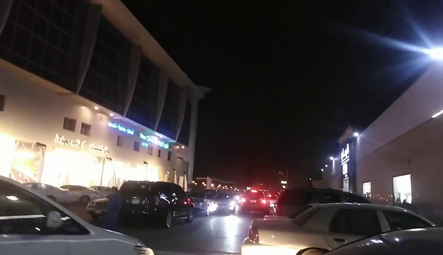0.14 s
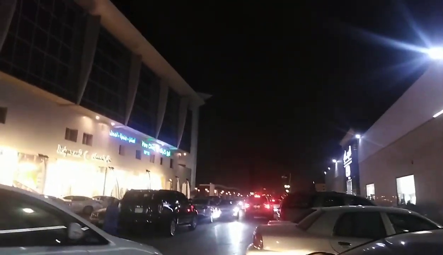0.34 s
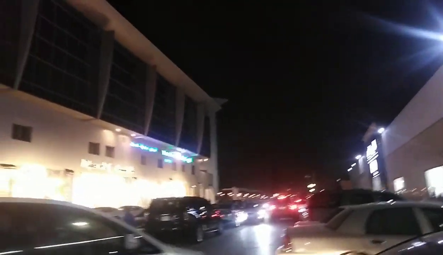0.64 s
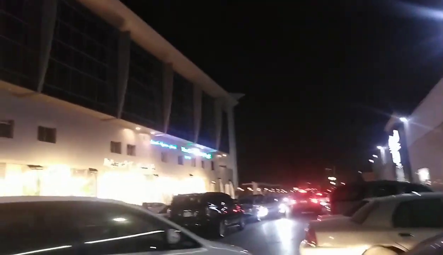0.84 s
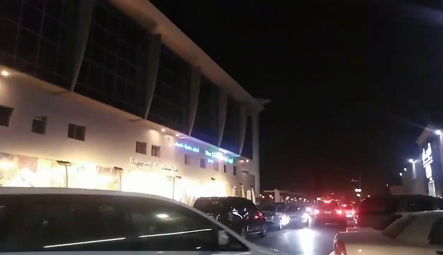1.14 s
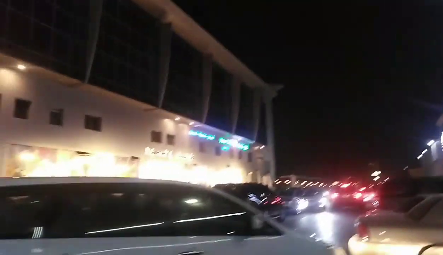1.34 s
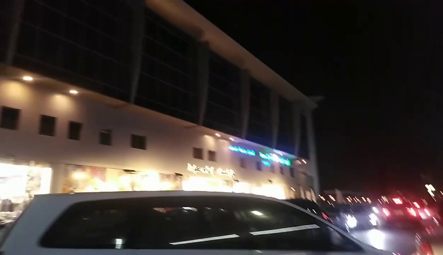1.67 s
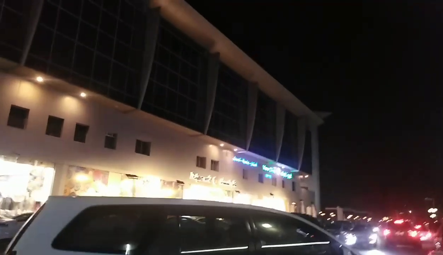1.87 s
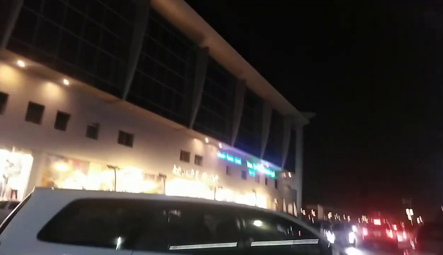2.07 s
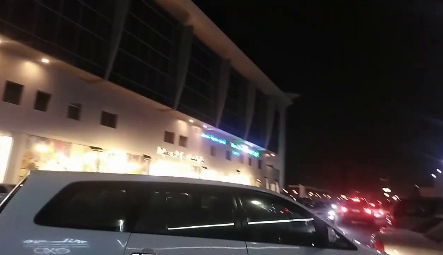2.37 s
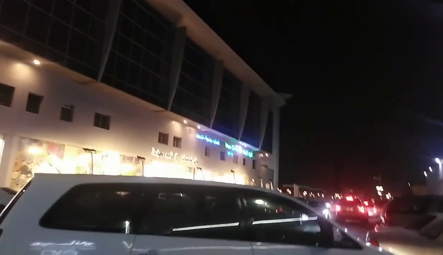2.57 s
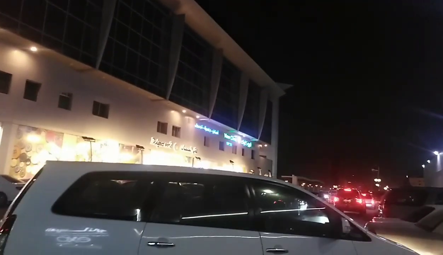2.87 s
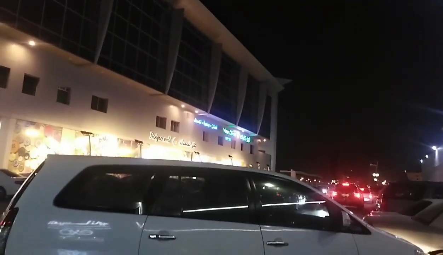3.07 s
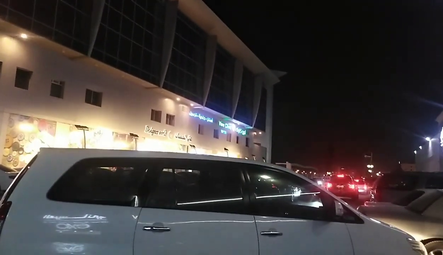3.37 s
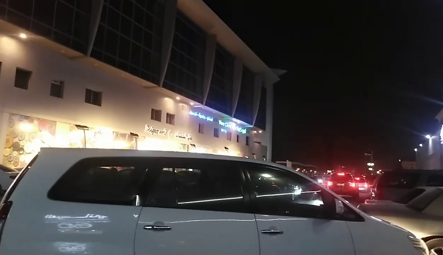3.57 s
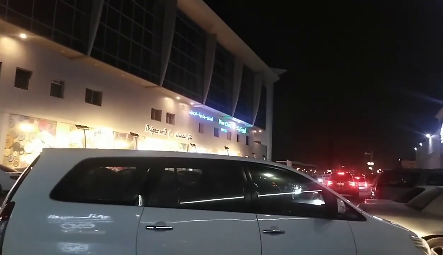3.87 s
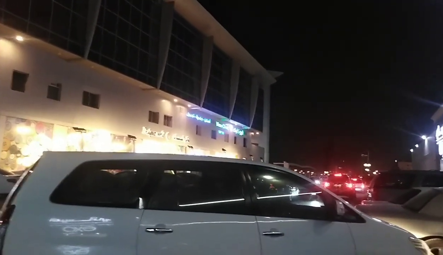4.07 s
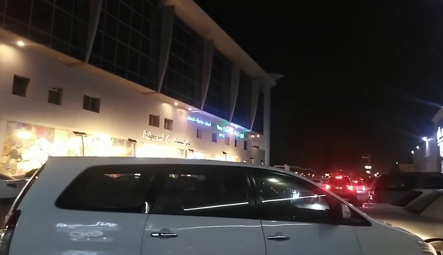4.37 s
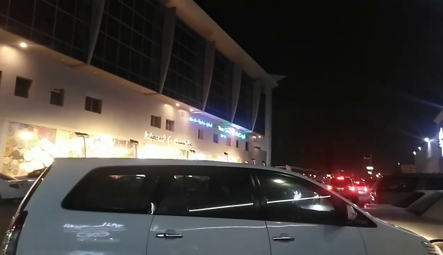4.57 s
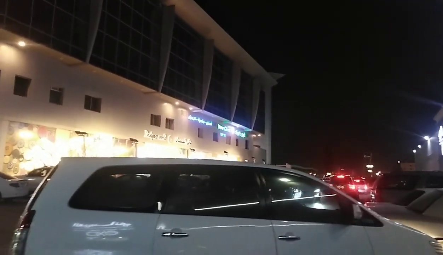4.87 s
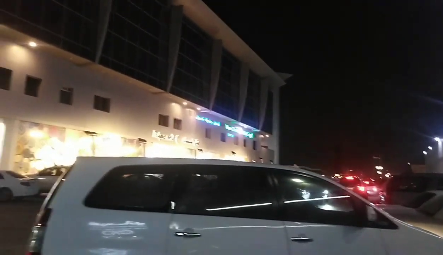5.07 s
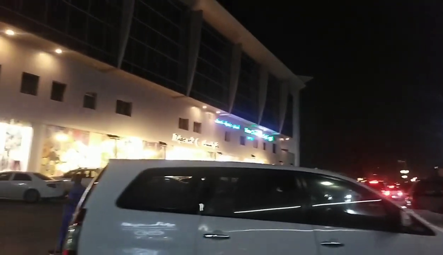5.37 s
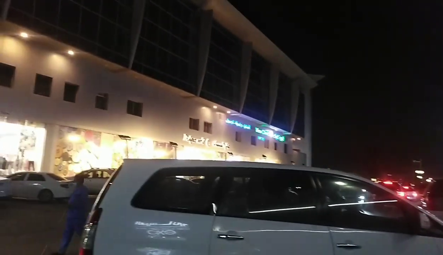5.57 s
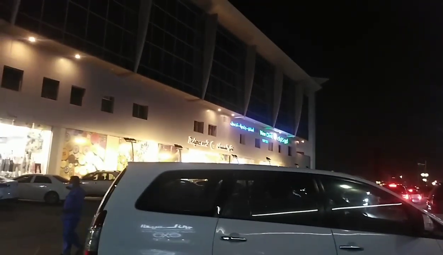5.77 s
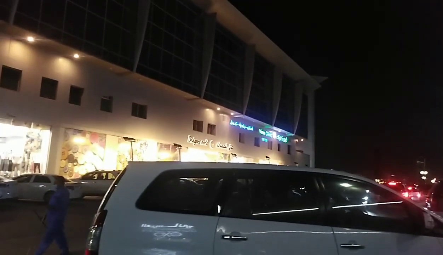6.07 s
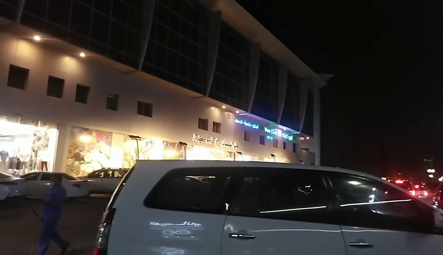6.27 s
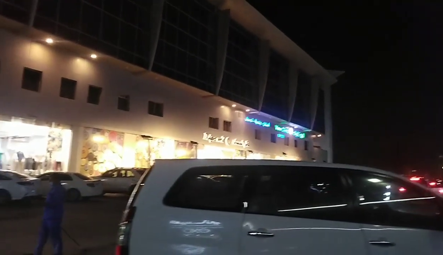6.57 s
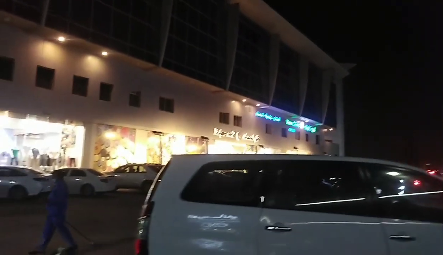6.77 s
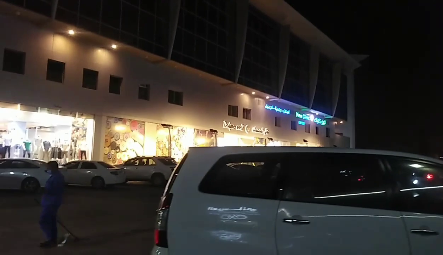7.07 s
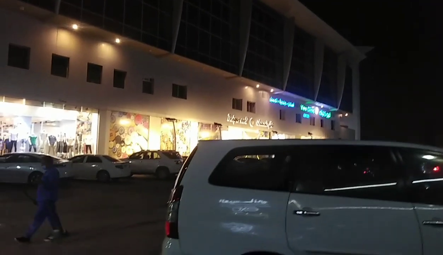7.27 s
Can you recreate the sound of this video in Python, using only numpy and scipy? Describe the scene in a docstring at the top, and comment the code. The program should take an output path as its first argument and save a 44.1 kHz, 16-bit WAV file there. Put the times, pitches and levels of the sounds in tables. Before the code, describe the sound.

A breathy, whistling rush of slow cars fades around a single brief horn blast, leaving low distant traffic, soft engine throb and faint swishes.

```python
"""A street beside a shopping centre at night: a slow queue of cars, heard from a hand-held phone.
Coloured noise makes a broad hiss that dies away and returns in swells; narrow noise bands whistle in it.
A short horn honk is a sum of partials and a rasp, with echoes off the fronts. Throbbing noise makes an
idling engine and air buffets. Shaped bursts and gliding tones make swishes, clicks, squeaks and low bumps;
distant traffic is steady low-weighted noise."""
import sys
import numpy as np
from scipy import signal
from scipy.fft import rfft, irfft, next_fast_len
from scipy.io import wavfile
from scipy.ndimage import map_coordinates

SR = 44100
rng = np.random.default_rng(int(sys.argv[2]) if len(sys.argv) > 2 else 0)


def output_pcm(signal):
    """Save a mono or channel-first signal as 16-bit PCM at the path in sys.argv[1].

    Samples are clipped to [-1, 1] before scaling.
    """
    pcm = np.clip(np.atleast_2d(signal).T, -1, 1) * 32767
    wavfile.write(sys.argv[1], SR, np.round(pcm).astype(np.int16))


N = 327211
T = np.arange(N) / SR  # time axis [s]

# In every table, pan is the left minus right level.
# distant traffic spectrum: (frequency [Hz], level [dB])
TOWN_COLOUR = [(25, -18), (42, 5), (60, 4), (120, 2), (200, -2), (300, -5.5), (500, -8), (800, -13),
               (1300, -18.3), (2200, -21), (4000, -27), (7000, -34), (10000, -39), (14000, -44)]
# low rumble spectrum of engine and buffets: (frequency [Hz], level [dB])
RUMBLE_COLOUR = [(22, -62), (36, -28), (50, -7), (70, 0), (95, 0), (120, -.5), (160, -13), (240, -26),
                 (400, -45), (2000, -85)]
# resonances rung by the engine's ticks: (frequency [Hz], first-stage width [Hz], level [dB])
TICK_MODES = [(3740, 50, -2), (3900, 50, -11), (4380, 90, -18), (5165, 25, -14), (5450, 70, -8),
              (6380, 110, -8)]
# thin engine chirp that comes and goes: (time [s], level [dB])
CHIRP_LEVEL = [(3.3, -67), (3.48, -63), (3.6, -70), (3.8, -66), (4.2, -67), (4.65, -62), (5.05, -61.5),
               (5.55, -64), (5.7, -72), (5.9, -68), (6.15, -72), (6.28, -63), (6.42, -67), (6.8, -66.5),
               (7.1, -64), (7.4, -62)]
# air buffeting the phone: (time [s], length [s], level [dB], pan [dB])
BUFFETS = [(-.06, .33, -41, 6), (.22, .26, -43, -5), (.46, .11, -36, 18), (.53, .2, -40, 2),
           (.68, .28, -44, 8), (.92, .26, -46, -4), (1.19, .16, -45, 17), (1.4, .2, -39, 14),
           (1.53, .3, -44, 2), (2.06, .28, -43, -18), (2.3, .19, -36, -20), (2.44, .17, -48, -2),
           (2.58, .24, -43, 11), (2.77, .4, -53, 11), (3.78, .19, -44.5, 5), (3.92, .55, -52, 8),
           (5.22, .34, -49, 10), (5.52, .78, -49.5, 7), (6.24, .44, -49.5, 8)]
# knocks on the phone: (time [s], relative level [dB], pitch [Hz], pan [dB])
BUMPS = [(.08, -31, 94, 5), (.475, -22, 74, 12), (1.005, -35, 81, 4), (1.255, -38, 86, 4),
         (1.445, -33, 80, 4), (1.522, -25, 155, 7), (1.55, -31, 72, 4), (2.095, -27, 135, -12),
         (2.33, -29, 100, -9), (2.375, -24, 95, -8), (2.385, -26, 180, -12), (2.645, -32, 94, 5),
         (2.685, -34, 94, 5), (3.812, -38, 91, 6), (6.335, -35, 91, 10)]
# swishes: (time [s], relative level [dB], rise [s], decay [s], hollow ring against the scrape [dB])
SWISHES = [(4.068, -43.5, .026, .018, -15), (4.1, -51, .012, .04, -14), (5.165, -50, .003, .02, -10),
           (5.26, -41.5, .014, .028, -16), (5.978, -53, .003, .05, -16), (6.022, -37.3, .02, .016, -4),
           (6.07, -44.5, .012, .03, -3), (7.204, -42, .008, .012, -12), (7.232, -47, .012, .03, -9),
           (7.318, -50, .005, .02, -14)]
# hollow ring of the swishes: (frequency [Hz], first-stage width [Hz], level [dB])
SWISH_MODES = [(2510, 70, -3), (2860, 60, 0), (4060, 110, -2), (4740, 90, -2), (5900, 90, -6)]
# sharp clicks: (time [s], level [dB], decay [s], pan [dB], bright snap against the body [dB])
CLICKS = [(1.128, -44, .002, 0, -3), (3.495, -46, .003, 10, -12), (5.166, -39, .0012, 2, 1),
          (5.179, -51, .002, 2, -3), (5.724, -60, .003, 7, -22), (5.979, -55, .009, 1, 1),
          (6.041, -37, .0012, 4, -10), (7.211, -47, .003, 11, -20), (7.301, -46, .003, 7, -18)]
# thin squeaks: (time [s], length [s], start [Hz], end [Hz], level [dB], pitch flutter [Hz], pan [dB])
SQUEAKS = [(1.28, .12, 3300, 5200, -43, 220, 5), (3.487, .03, 1740, 1740, -61, 90, 12),
           (4.03, .05, 590, 590, -63, 20, 2), (4.09, .07, 2430, 2460, -62, 40, -8),
           (4.27, .17, 8400, 8800, -55, 50, 2), (5.325, .085, 2280, 2480, -63, 45, -10),
           (5.5, .06, 1690, 1690, -67, 30, -8), (7.19, .12, 1760, 1790, -58, 60, -7),
           (7.305, .04, 1800, 1800, -65, 60, -7), (7.23, .06, 2400, 2550, -58, 80, -6)]
# spectra of scrape, click body and snap: (frequency [Hz], level [dB])
SCRAPE_COLOUR = [(1900, -30), (2600, -19), (3300, -19), (3900, -1), (6300, 1), (8000, -10), (13500, -24)]
CLICK_COLOUR = [(1200, -20), (3500, -8), (4800, 0), (6200, 0), (8000, -15), (14000, -32)]
SNAP_COLOUR = [(4500, -20), (7000, -2), (9500, 0), (14000, -6)]
# upper whistle, in gliding puffs: (time [s], length [s], start [Hz], end [Hz], level [dB], pan [dB])
WHISTLE = [(-.04, .22, 1440, 1430, -48, 3), (.15, .22, 1390, 1370, -49, 3),
           (.39, .19, 1390, 1280, -45.5, 0), (.555, .18, 1340, 1240, -45, 0),
           (.71, .14, 1290, 1340, -43, 0), (.82, .15, 1320, 1240, -46, 2), (.94, .15, 1230, 1290, -50, 2),
           (1.07, .13, 1340, 1410, -42.5, 0), (1.2, .09, 1380, 1410, -44, 0),
           (1.44, .18, 1360, 1320, -57, -12), (1.64, .09, 1320, 1220, -46, -7),
           (1.72, .18, 1260, 1340, -54, -5), (2.9, .2, 1340, 1330, -61, -15)]
# lower whistle, around one pitch: (time [s], length [s], level [dB], pan [dB])
LOW_WHISTLE = [(-.08, .24, -44.5, 1), (.12, .72, -56, -20), (.78, .26, -53, -9), (1, .29, -56, -20),
               (1.37, .17, -55, -20), (1.53, .12, -52, -10), (1.62, .42, -56, -20), (2.98, .32, -63, -15),
               (3.27, .34, -60, -18), (3.78, .26, -64, -15), (4.38, .21, -63, -15), (4.88, .16, -64, -15),
               (5.21, .09, -65, -15), (5.58, .21, -61, -18), (5.88, .12, -65, -15), (6.52, .08, -67, -15),
               (7.31, .09, -68, -15)]
# fits of a faint hollow tone: (time [s], length [s], level [dB])
HOLLOW_PUFFS = [(3.87, .08, -71), (4.03, .13, -67), (4.19, .11, -66), (4.32, .1, -66), (4.54, .12, -69),
                (4.82, .15, -68), (5.02, .05, -72), (5.18, .17, -63), (5.44, .11, -68)]
# main course of the hiss, sinking around the honk: (time [s], relative level [dB])
HISS_LEVEL = [(0, -41), (.2, -42.5), (1.33, -40), (1.45, -42), (1.82, -43), (2, -47), (2.3, -48),
              (2.5, -52), (2.77, -49), (2.97, -55), (3.22, -49), (3.33, -47.5), (3.45, -72), (3.7, -95)]
# lower part of the hiss, strong only while the source is close: (time [s], relative level [dB])
RUSH_LEVEL = [(0, -44), (.42, -54), (.85, -49), (1.03, -51), (1.22, -44.5), (1.5, -52), (1.85, -52),
              (2.05, -59), (2.7, -76), (3.3, -64), (3.5, -95)]
# later overlapping swells of the hiss: (time [s], length [s], relative level [dB])
SWELLS = [(3.72, .45, -70), (4.04, .34, -55), (4.35, .17, -56), (4.48, .22, -59), (4.68, .46, -57),
          (5.13, .14, -57), (5.21, .25, -51), (5.38, .22, -65), (6.02, .17, -59), (6.53, .2, -60.5),
          (6.74, .2, -68), (7, .22, -69), (7.15, .36, -52)]
# one flare of the top octave after the honk: (time [s], length [s], level [dB])
FIZZ = (2.47, .36, -60)
# spectra of the full hiss, the later thin hiss, its top and its lower rush: (frequency [Hz], level [dB])
HISS_COLOUR = [(1950, -30), (2650, -7), (3200, -4.5), (3800, -.5), (4500, 0), (5500, -2), (6600, -7),
               (8000, -18), (10000, -32)]
THIN_COLOUR = [(2300, -36), (3300, -20), (3750, -2), (4400, 0), (5500, -1.5), (6400, -5), (7300, -19),
               (9000, -42)]
TOP_COLOUR = [(5000, -14), (7400, 0), (9000, 0), (11000, -7), (14000, -18)]
RUSH_COLOUR = [(350,-20),(480,-13),(650,-20),(850,-12),(1150,-15),(1620,-13),(1850,1.5),(2200,-2),(2700,1),(3200,-3),(4000,-14),(6000,-35)]
# the honk: (start [s], release [s], pitch [Hz], level [dB])
HORN = (2.011, 2.212, 450.1, -25)
# horn partials: (multiple of the pitch, left [dB], right [dB], echo in the street [dB], echo pan [dB])
HORN_PARTIALS = [(1,-2.3,-3.2,-13,2),(2,-6,-6.3,-15,0),(3,-7,-1.5,-12,-3),(4,-36,-15,-18,-10),(5,-18,-13,-21,-3),(6,-24,-16,-22,-2),(7,-36,-34,-40,-2),(8,-12,-14,-20,3),(9,1.2,-7.3,-23,6),(10,0,-10,-24,6),(11,-12,-18,-27,5),(12,-11,-16,-31,5),(13,-26,-30,-39,4),(14,-23,-28,-37,4),(16,-13,-20,-39,2),(18,-20,-22,-45,-3)]
# late returns of low partials from far fronts: (multiple, delay [s], level [dB], pan [dB], t60 [s])
HORN_ECHOES = [(1,.13,-18,8,.15),(1,.25,-23.5,-7,.13),(2,.16,-21,8,.28),(2,.27,-28,-8,.36),(3,.09,-13,6,.36),(3,.41,-28,-25,.3),(4,.1,-19,20,.3),(4,.26,-22.5,22,.33),(5,.23,-26,-2,.36),(6,.25,-38,15,.35)]
# horn rasp spectrum: (frequency [Hz], level [dB])
RASP_COLOUR = [(700, -36), (1150, -17), (1600, -28), (1950, -25), (2350, -2), (2800, 1), (3080, -17),
               (3330, -19), (3650, 0), (5000, -1), (6500, -4), (7400, -10), (8500, -19), (14000, -29)]
# echo of the street: (frequency [Hz], t60 [s])
STREET = [(450, .3), (900, .42), (1350, .5), (1800, .38), (2300, .4), (2800, .32), (8000, .38)]

IDLE_HZ = 23.6  # firing rate
TICK_DB = -65
CHIRP_HZ, CHIRP_SCATTER_DB = 5780, 3.3  # pitch; random spread of its strength
RUMBLE_DB, RUMBLE_PAN_DB = -58.5, 1.5  # steady engine rumble
LOW_WHISTLE_HZ, HOLLOW_HZ = 990, 2850
HISS_REST_DB, HISS_PAN_DB = -77, 4.8  # relative level under the swells; left minus right
TOP_NEAR_DB, TOP_FAR_DB = -13.5, -7  # top octave against the flow of the full hiss and of the thin one
PORT_LAG_S = .00025  # sound common to both ports reaches the right one first
TOP_HZ = 14100  # upper limit of the phone


def undb(db):
    """Logarithmic level: decibels to amplitude gain."""
    return 10 ** (np.asarray(db) / 20)


def unit(x):
    """Power normalisation: scale to rms 1."""
    return x / np.sqrt(np.mean(x ** 2))


def curves(table):
    """Linear interpolation: join each column of a table by straight lines in time."""
    s, *columns = np.transpose(table)
    return [np.interp(T, s, column) for column in columns]


def pan(db):
    """Level-difference stereo: left and right gains of constant mean power."""
    gains = undb(np.array([[.5], [-.5]]) * db)
    return gains / np.sqrt(np.mean(gains ** 2, axis=0))


def along(points, hz):
    """Logarithmic frequency scale: read (Hz, value) points between their entries."""
    f, value = np.transpose(points)
    return np.interp(np.log(hz + 1), np.log(f), value)


def noise(colour, channels=2):
    """Spectral shaping: uncorrelated noises of one colour, rms 1."""
    size = next_fast_len(N, True)
    gain = undb(along(colour, np.fft.rfftfreq(size, 1 / SR)))
    spectrum = rfft(rng.standard_normal((channels, size)))
    return unit(irfft(spectrum * gain, size)[:, :N])


def walk(rate):
    """Band-limited random modulation: a smooth wander with a spread near 1."""
    points = rng.standard_normal(int(N / SR * rate) + 4)
    fine = signal.resample(points, 4 * len(points))
    return np.interp(T * rate, np.arange(len(fine)) / 4, fine)


def ring(x, hz, width_hz):
    """Simple resonance: one peak of gain 1 at its centre."""
    return signal.lfilter(*signal.iirpeak(hz, hz / width_hz, SR), x)


def resonances(x, modes):
    """Modal superposition: each mode is two resonators in series, the second twice as wide."""
    return [ring(ring(x, hz, width), hz, 2 * width) for hz, width, _ in modes]


def high_pass(x, order, hz):
    """High-pass filtering: a Butterworth slope below a corner frequency."""
    return signal.sosfilt(signal.butter(order, hz, "high", fs=SR, output="sos"), x)


def tone(hz):
    """Phase integration: a clean tone on a moving pitch, rms 1."""
    return np.sqrt(2) * np.sin(2 * np.pi * np.cumsum(hz) / SR)


def narrow(hz, width_hz):
    """Quadrature modulation: slow noise carried to a moving pitch is a breathy tone."""
    phase = 2 * np.pi * np.cumsum(hz + 0 * T) / SR
    low_pass = signal.butter(2, width_hz / 2, fs=SR, output="sos")
    slow = signal.sosfilt(low_pass, rng.standard_normal((2, 2, N)))
    return unit(slow[0] * np.cos(phase) + slow[1] * np.sin(phase))


def burst(rise, decay):
    """Impulsive excitation: a straight rise followed by an exponential fall."""
    t = T[:SR // 3]
    return np.minimum(t / rise, 1) * np.exp(-np.maximum(t - rise, 0) / decay)


def arch(s, length, round_off):
    """Amplitude envelope: a half-sine swell; a small round_off flattens its top."""
    out = np.zeros(N)
    inside = slice(max(int(s * SR), 0), int((s + length) * SR))
    out[inside] = np.abs(np.sin(np.pi * (T[inside] - s) / length)) ** round_off
    return out


def add(out, s, sound):
    """Superposition: mix a short sound in at time s."""
    start = int(s * SR)
    out[:, start:start + sound.shape[-1]] += sound[..., :N - start]


def mottle(x, depth_db, width_hz, hold_s):
    """Turbulent fluctuation: patches of the spectrum swell and fade on their own."""
    f, t, cells = signal.stft(x, SR, nperseg=512)
    field = rng.standard_normal((int(f[-1] / width_hz) + 2, int(t[-1] / hold_s) + 2))
    places = np.meshgrid(f / width_hz, t / hold_s, indexing="ij")
    swell = map_coordinates(field, places, order=1)
    return signal.istft(cells * unit(undb(depth_db * swell)), SR)[1][:, :N]


def ports(x, share):
    """Interaural coherence: part of a sound is common to both ports and reaches the left one late."""
    share = np.clip(share, 0, 1)
    late = np.interp(T - PORT_LAG_S, T, x[1])
    return np.array([np.sqrt(1 - share) * x[0] + np.sqrt(share) * late, x[1]])


def panels(x, share, spread_s, count=5):
    """Comb filtering: short reflections from nearby car bodies, different on each side."""
    out = x.copy()
    for side in range(2):
        for lag in rng.uniform(.3, 1, count):
            out[side] += share * np.roll(x[side], int(lag * spread_s * SR))
    return out / np.sqrt(1 + count * share ** 2)


def street(x, build_s):
    """Diffuse reverberation: the fronts return decaying noise with a t60 for each frequency."""
    f, t, cells = signal.stft(rng.standard_normal((2, SR)), SR, nperseg=256)
    fade = undb(-60 * t / along(STREET, f)[:, None])
    tail = signal.istft(cells * fade * (1 - np.exp(-t / build_s)), SR)[1]
    return signal.fftconvolve(x, unit(tail) / np.sqrt(tail.shape[1]), axes=1)[:, :N]


def lingering(gate, t60, build_s):
    """Energy summation: the powers of many echo paths add up and die away; returns amplitude."""
    t = T[:SR]
    power = undb(-120 * t / t60) * (1 - np.exp(-t / build_s)) ** 2  # -120 here is -60 dB of power
    total = signal.fftconvolve(gate ** 2, power / power.sum())[:len(gate)]
    return np.sqrt(np.maximum(total, 0))


def town():
    """Spatial coherence: distant traffic is alike on both sides in the bass, diffuse in the treble."""
    common = noise(TOWN_COLOUR, channels=1)
    apart = high_pass(noise(TOWN_COLOUR, channels=1), 1, 1100)
    return (common + apart * np.array([[1], [-1]])) * undb(-60.5 + .7 * walk(2))


def engine():
    """Periodic excitation: idle firing drives low rumble, harmonics, metallic ticks and a thin chirp."""
    turns = np.cumsum(IDLE_HZ * (1 + .008 * walk(3))) / SR  # firing cycles
    throb = 1 + .4 * np.cos(2 * np.pi * turns)
    rumble = unit(throb * (noise(RUMBLE_COLOUR, channels=1) + .6 * noise(RUMBLE_COLOUR)))
    hum = .3 * np.sin(2 * np.pi * 3 * turns) + .25 * np.sin(2 * np.pi * 5 * turns)
    low = (rumble + hum) * undb(RUMBLE_DB + 1.2 * walk(4)) * pan(RUMBLE_PAN_DB)

    taps = (.35 + np.exp(-(turns % 1) / .26)) * undb(2.3 * walk(14)) * rng.standard_normal((2, N))
    rung = zip(resonances(taps, TICK_MODES), TICK_MODES)
    ticks = unit(sum(undb(db + 3.2 * walk(6)) * x for x, (_, _, db) in rung))
    ticks = signal.sosfilt(signal.butter(4, 7200, fs=SR, output="sos"), ticks)

    chirp_db, = curves(CHIRP_LEVEL)
    chirp_hz = CHIRP_HZ * (1 + .004 * walk(20))
    squeal = tone(chirp_hz * (1 + .004 * walk(160))) + .45 * narrow(chirp_hz, width_hz=150)
    pulse = 1 + .75 * np.cos(2 * np.pi * turns + .7 * walk(12))  # once a firing
    chirp = unit(squeal * pulse * undb(CHIRP_SCATTER_DB * walk(22)))
    return low + (ticks * undb(TICK_DB) + chirp * undb(chirp_db)) * pan(17)


def buffets():
    """Flow noise: gusts of low, throbbing rumble, each with its own balance between the sides."""
    push = sum(undb(db) * pan(pan_db) * arch(s, length, round_off=.6) for s, length, db, pan_db in BUFFETS)
    throb = 1 + .45 * np.cos(2 * np.pi * IDLE_HZ * T)
    return push * unit(throb * (noise(RUMBLE_COLOUR, channels=1) + 1.4 * noise(RUMBLE_COLOUR)))


def bumps():
    """Damped oscillation: soft knocks on the phone last a few low cycles each."""
    out = np.zeros((2, N))
    for s, db, hz, pan_db in BUMPS:
        cycles = T[:SR // 4] * hz
        shape = (1 - np.exp(-cycles / .8)) ** 2 * np.exp(-cycles / 1.1)
        lead = np.array([[1.1], [0]])  # radians by which the left side leads
        knock = shape / shape.max() * np.sin(2 * np.pi * cycles + lead)
        add(out, s, undb(db - 1.5) * pan(pan_db) * knock)
    return out


def swishes():
    """Friction noise: mottled scrapes with a hollow modal ring, comb filtered by nearby cars."""
    swish, ringing = np.zeros((2, 2, N))
    for s, db, rise, decay, hollow_db in SWISHES:
        add(ringing, s, undb(db + hollow_db) * burst(rise, decay))
        add(swish, s, undb(db) * burst(rise, decay))
    brush = mottle(ports(noise(SCRAPE_COLOUR), share=.4), depth_db=5.5, width_hz=200, hold_s=.07)
    rung = zip(resonances(rng.standard_normal((2, N)), SWISH_MODES), SWISH_MODES)
    hollow = unit(sum(undb(db) * x for x, (_, _, db) in rung))
    scrape = swish * panels(brush, share=.45, spread_s=.0035) + ringing * hollow
    return scrape * undb(2.2 * walk(1100) - .9) * pan(4.5)


def clicks():
    """Impulsive noise: abrupt bursts with a body and a brighter snap."""
    click, snap = np.zeros((2, 2, N))
    for s, db, decay, pan_db, snap_db in CLICKS:
        hit = undb(db) * pan(pan_db) * burst(.0003, decay)
        add(click, s, hit)
        add(snap, s, hit * undb(snap_db))
    return click * noise(CLICK_COLOUR) + snap * noise(SNAP_COLOUR)


def squeaks():
    """Frequency modulation: thin tones glide and flutter in pitch."""
    out = np.zeros((2, N))
    for s, length, start_hz, end_hz, db, flutter_hz, pan_db in SQUEAKS:
        u = np.linspace(0, 1, int(length * SR))
        glide = start_hz + (end_hz - start_hz) * u * (2 - u)
        hz = glide + flutter_hz * walk(400)[:len(u)]
        squeak = np.sin(np.pi * u) * tone(hz)
        add(out, s, undb(db + 3) / np.sqrt(2) * pan(pan_db) * squeak)
    return out


def small_sounds():
    """Direct and reverberant fields: small sounds from the queue and their street echo."""
    out = swishes() + squeaks() + clicks()
    return out + undb(-13) * street(out, build_s=.02)


def upper_whistle():
    """Narrow-band radiation: gliding puffs of tone and breath with an early breathy octave."""
    glides = []
    for s, length, start_hz, end_hz, _, _ in WHISTLE:
        glides += [(s + length / 6, start_hz), (s + length * 5 / 6, end_hz)]
    hz = curves(sorted(glides))[0] * (1 + .01 * walk(25))
    puffs = sum(undb(db) * pan(pan_db) * arch(s, length, round_off=.7)
                for s, length, _, _, db, pan_db in WHISTLE)
    clean = tone(hz * (1 + .012 * walk(110))) * undb(-5.8 + 4 * walk(45))
    breath = undb(-2.5) * narrow(hz, width_hz=110)
    octave = narrow(2 * hz, width_hz=85) * np.clip((2.4 - T) / .6, 0, 1)
    return (clean + breath + octave) * puffs * undb(.8)


def lower_whistle():
    """Amplitude modulation: a breathy tone flutters as it comes and goes."""
    puffs = sum(undb(db) * pan(pan_db) * arch(s, length, round_off=.7)
                for s, length, db, pan_db in LOW_WHISTLE)
    flutter = 1 + .4 * np.cos(2 * np.pi * IDLE_HZ * T)
    breath = narrow(LOW_WHISTLE_HZ * (1 + .022 * walk(9)), width_hz=75)
    return breath * puffs * flutter * undb(2)


def hollow_tone():
    """Narrow-band noise: a faint hollow tone comes in fits, mostly on the left."""
    fits = sum(undb(db) * arch(s, length, round_off=.6) for s, length, db in HOLLOW_PUFFS)
    return narrow(HOLLOW_HZ * (1 + .012 * walk(14)), width_hz=100) * fits * pan(15)


def hiss():
    """Broadband noise: gritty traffic hiss turns from full to thin, coloured by reflections."""
    db, = curves(HISS_LEVEL)
    rush_db, = curves(RUSH_LEVEL)
    swells = sum(undb(d) * arch(s, length, round_off=1.3) for s, length, d in SWELLS)
    flow = undb(db) + undb(HISS_REST_DB) + swells
    grit = undb(1.1 * walk(260) + .7 * walk(18) + .8 * walk(900))
    far = np.clip((T - 1.9) / 2, 0, 1)  # 0 full, 1 thin

    hollow = undb(-27 + 4 * walk(9)) * narrow(2860, width_hz=120) * pan(8)
    thin = ports(noise(THIN_COLOUR), share=.55) + hollow
    full = ports(noise(HISS_COLOUR), share=.35)
    body = (np.sqrt(1 - far) * full + np.sqrt(far) * thin) * flow * undb(2.6) * pan(HISS_PAN_DB)

    fizz_s, fizz_length, fizz_db = FIZZ
    fizz = undb(fizz_db) * arch(fizz_s, fizz_length, round_off=1.5)
    top_level = fizz + flow * undb(TOP_NEAR_DB * (1 - far) + TOP_FAR_DB * far)
    top = noise(TOP_COLOUR) * top_level * pan(-7 - 9 * far)
    rush = ports(noise(RUSH_COLOUR), share=.35) * undb(rush_db + 3.3) * pan(-1)
    swirl = mottle(body + top + rush, depth_db=4.3, width_hz=130, hold_s=.055)
    return panels(grit * swirl, share=.11 + .13 * far, spread_s=.004)


def horn():
    """Harmonic series: a disc horn's diaphragm strikes once a cycle; near and far fronts ring on."""
    on, off, hz, db = HORN
    live = (T > on) & (T < off + 1)
    t = T[live]

    def held(delay):
        """Gating: straight attack and release, delayed by the path."""
        return np.clip((t - delay - on) / .018, 0, 1) * np.clip(1 - (t - delay - off) / .013, 0, 1)

    gate = held(0)
    phase = 2 * np.pi * np.cumsum(hz * (1 + .001 * walk(120))[live]) / SR
    out, rasp = np.zeros((2, 2, N))
    for k, left_db, right_db, street_db, street_pan_db in HORN_PARTIALS:
        lead = min(.28 * k, 2.4)  # radians by which the left port leads
        rattle = undb(min(.35 + .06 * k, .9) * walk(110)[live])
        partial = np.sin(k * phase + np.array([[lead], [0]])) * gate ** (1 + .1 * k)
        out[:, live] += undb([[left_db], [right_db]]) * rattle * partial

        near = lingering(gate, along(STREET, k * hz), build_s=.05)
        power = (undb(street_db) * pan(street_pan_db) * near) ** 2
        for multiple, delay, echo_db, pan_db, t60 in HORN_ECHOES:
            if round(multiple) == k:
                late = lingering(held(delay), t60, build_s=.01)
                power += (undb(echo_db) * pan(pan_db) * late) ** 2
        # paths over the moving cars ruffle the echo; the phase drifts most in the higher partials
        drift = np.array([walk(26)[live] + .3 * walk(130)[live] for _ in range(2)]) * (.55 + .1 * k)
        ruffle = np.array([walk(80)[live] + .6 * walk(14)[live] for _ in range(2)])
        out[:, live] += np.sqrt(power) * undb(2.5 * ruffle - 1.3) * np.cos(k * phase + drift)

    rough = mottle(noise(RASP_COLOUR), depth_db=4.5, width_hz=170, hold_s=.09)[:, live]
    rasp[:, live] = rough * gate * (1 + .6 * np.cos(phase)) * pan(3)
    return undb(db) * (np.sqrt(2) * out + undb(-10) * rasp + undb(-13) * street(rasp, build_s=.07))


def scene():
    """Linear superposition: everything in the street together."""
    background = town() + engine() + buffets() + bumps() + small_sounds()
    whistles = upper_whistle() + lower_whistle() + hollow_tone()
    return background + whistles + hiss() + horn()


def record(dry):
    """Band limitation: the phone drops the deepest bass and cuts the top."""
    thinned = high_pass(dry, 2, 32)
    return signal.sosfilt(signal.ellip(10, .2, 70, TOP_HZ, fs=SR, output="sos"), thinned)


dry = scene()
out = record(dry)
output_pcm(out)
```